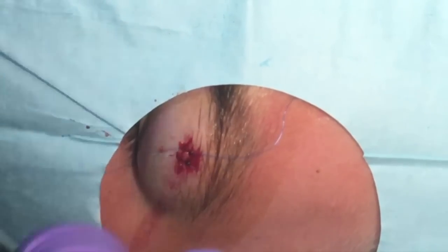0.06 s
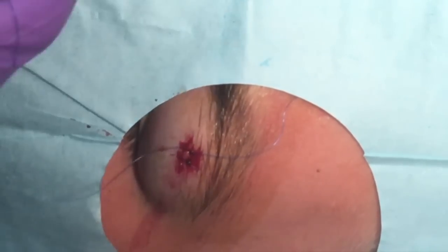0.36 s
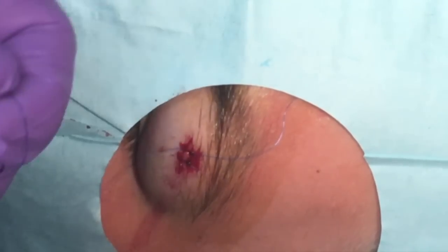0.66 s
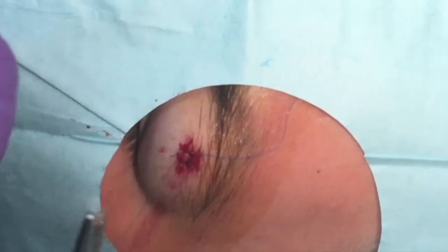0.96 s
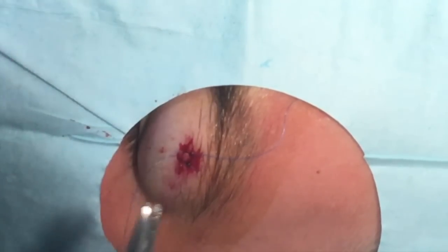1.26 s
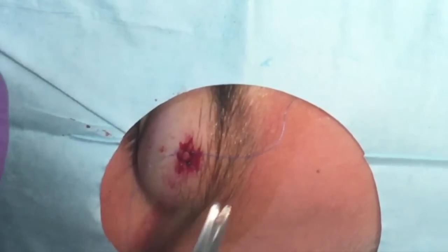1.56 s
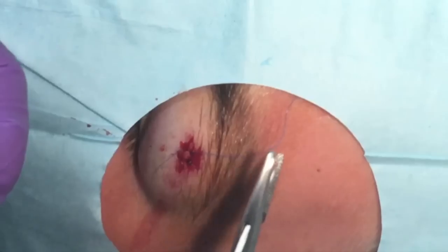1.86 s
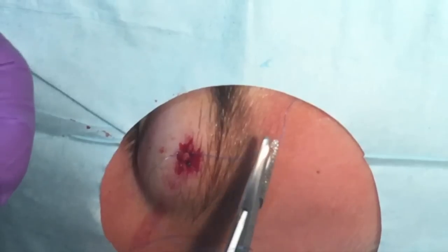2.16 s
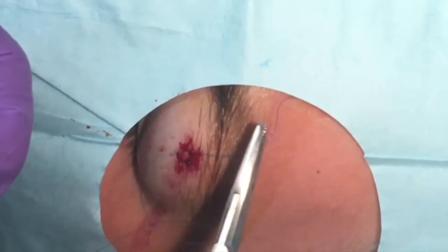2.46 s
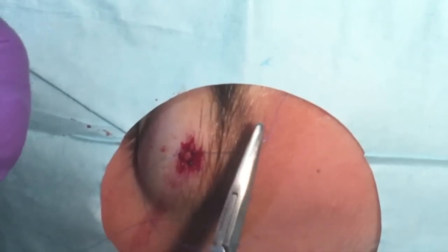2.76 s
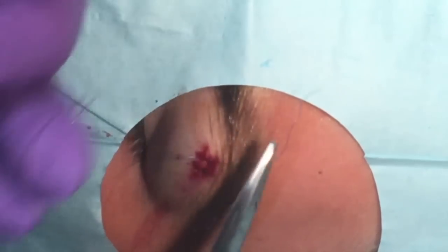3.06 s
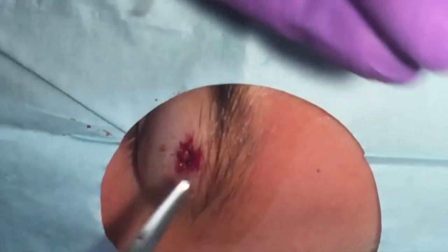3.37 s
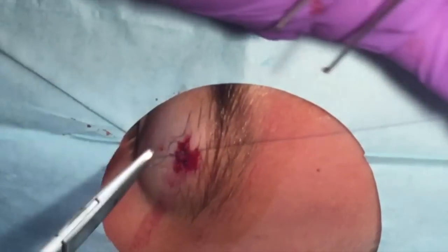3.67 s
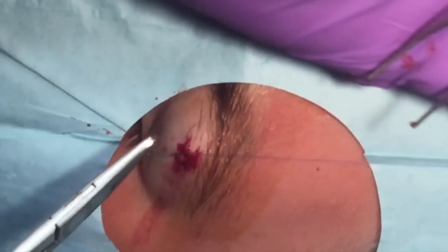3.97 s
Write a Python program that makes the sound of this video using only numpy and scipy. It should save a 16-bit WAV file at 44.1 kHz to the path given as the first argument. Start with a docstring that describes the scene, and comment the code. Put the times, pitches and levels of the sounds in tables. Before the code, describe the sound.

A metal needle holder clicks shut twice over a faint low hum.

```python
"""A quiet room, close on a steel needle holder being squeezed shut on a suture.
Its ratchet snaps over two teeth, each one ringing the steel arms, thumping the hand and stirring a short
room tail; then the catch settles with a light tick. The handling makes faint ticks, and the gloved grip
sticks and slips in a small creak. Underneath lie a deep hum, a low rumble and a faint, swelling hiss."""
import sys
import numpy as np
from scipy import signal
from scipy.fft import rfft, irfft
from scipy.io import wavfile
from scipy.ndimage import uniform_filter1d

SR = 44100
rng = np.random.default_rng(int(sys.argv[2]) if len(sys.argv) > 2 else 0)


def store_pcm(level_fs):
    """Save levels as 16-bit WAV."""
    pcm = np.round(np.clip(level_fs, -1, 1) * 32767).astype(np.int16)
    wavfile.write(sys.argv[1], SR, np.atleast_2d(pcm).T)


N = 176400


def amp(db):
    return 10 ** (np.asarray(db) / 20)


def unit_rms(x):
    return x / np.sqrt(np.mean(x ** 2) + 1e-20)


def curve_at(points, hz):
    """Straight lines between points on a log-frequency axis."""
    point_hz, value = np.transpose(points)
    return np.interp(np.log(hz + 1), np.log(point_hz + 1), value)


def fader(points):
    """Gain per sample from (seconds, dB) points."""
    return amp(np.interp(np.arange(N) / SR, *np.transpose(points)))


def add(mix, start_s, sound):
    part = mix[round(start_s * SR):][:len(sound)]
    part += sound[:len(part)]


def decay(t, t60):
    """An envelope that falls 60 dB in t60 seconds."""
    return np.exp(-np.log(1000) * t / t60)


def noise(spectrum, size, top_hz=15800):
    """Noise of rms 1, coloured by (Hz, dB) points."""
    hz = np.fft.rfftfreq(size, 1 / SR)
    white = rfft(rng.standard_normal(size))
    return unit_rms(irfft(white * amp(curve_at(spectrum, hz)) * (hz < top_hz), size))


def band_pass(x, edges_hz):
    return signal.sosfilt(signal.butter(2, edges_hz, "band", fs=SR, output="sos"), x)


def high_pass(x, hz):
    return signal.sosfilt(signal.butter(2, hz, "high", fs=SR, output="sos"), x)


def ring(modes, t):
    """Dying sines, one per mode."""
    return sum(amp(db) * decay(t, t60) * np.sin(2 * np.pi * hz * t) for hz, db, t60 in modes)


# Tone of the steady floor and of the hiss. Each row: frequency in Hz, relative level in dB.
FLOOR_TONE = [(100, 7.5), (700, 3.5), (1500, -1.5), (2600, -5), (4800, -9.5), (6300, -9), (9000, -10.5),
              (10400, -18), (11500, -12), (14000, -16), (15700, -17)]
HISS_TONE = [(200, -1), (600, 0), (900, -2.5), (1400, -2.5), (2200, -2.5), (3200, -7.5), (4400, -7),
             (4950, -11.5), (5600, -6), (6500, -7), (7600, -11), (9200, -10), (10400, -15), (11700, -13),
             (14000, -16.5), (15700, -17.5)]
# The swells of the hiss. Each row: time in seconds, level in dB.
HISS_SWELLS = [(0, -67.5), (.15, -74), (.27, -67.5), (.41, -76), (.65, -73), (.75, -80), (1.15, -78.5),
               (1.5, -84), (1.75, -84.5), (1.92, -75), (2.12, -83.5), (2.34, -81.5), (2.47, -71),
               (2.62, -78), (2.8, -79), (3.05, -69), (3.345, -68), (3.38, -73.5), (3.54, -74.5),
               (3.63, -79), (4, -79.5)]


def hiss(floor_db=-76.5, flutter_db=1.1):
    """A steady noise floor and a brighter hiss that swells and flutters."""
    flutter = amp(flutter_db * unit_rms(uniform_filter1d(rng.standard_normal(N), size=900)))
    bright = unit_rms(high_pass(noise(HISS_TONE, N), hz=196))
    return amp(floor_db) * noise(FLOOR_TONE, N) + fader(HISS_SWELLS) * flutter * bright


# The slow swell of the hum. Each row: time in seconds, level in dB.
HUM_SWELL = [(0, -44), (.45, -43.3), (.95, -48), (1.3, -53.5), (1.65, -49), (2.05, -44.3), (2.55, -43.5),
             (2.88, -47.5), (3.2, -44.7), (3.7, -42.5), (4, -45)]
# Tone of the rumble. Each row: frequency in Hz, relative level in dB.
RUMBLE_TONE = [(12, -30), (28, -18), (40, -12), (55, 0), (75, 2.5), (95, 0.5), (105, -11), (130, -4.5),
               (150, -10), (175, -17), (250, -21.5), (320, -26), (370, -23), (460, -35), (560, -37),
               (1000, -42.5), (2500, -61.5)]


def hum_and_rumble(deep_hz=58.02, upper_hz=119, upper_db=-65, rumble_db=-55.5):
    """A deep hum waxes and wanes under a faint steady tone; the room's rumble gently follows it."""
    phase_per_hz = 2 * np.pi * np.arange(N) / SR
    swell = fader(HUM_SWELL)
    hum = swell * np.sin(deep_hz * phase_per_hz) + amp(upper_db) * np.sin(upper_hz * phase_per_hz)
    rumble = amp(rumble_db) * unit_rms(swell ** 0.3) * noise(RUMBLE_TONE, N)
    return np.sqrt(2) * hum + rumble


# Light handling ticks. Each row: start in seconds, then low, mid and high band levels in dB.
HANDLING_TICKS = [(.4838, -62, -59.5, -75), (.490, -69, -64, -76), (0.5162, -55, -72, -82),
                  (.846, -75, -65.5, -72), (1.523, -71, -73, -63.5), (2.609, -67, -68, -62.5),
                  (2.722, -71, -65, -65), (2.7713, -59, -66, -78), (3.185, -63, -70, -75),
                  (3.3757, -57, -62, -81), (3.5412, -72, -62.5, -72), (3.7102, -57, -81, -82)]


def handling_ticks(t60=0.0099, bands_hz=((1000, 1940), (3000, 6400), (8000, 14000))):
    """The tool shifts in the hand: tiny dry bursts of noise in three bands."""
    out, t = np.zeros(N), np.arange(SR // 10) / SR
    for start_s, *levels_db in HANDLING_TICKS:
        burst = sum(amp(db) * unit_rms(band_pass(rng.standard_normal(len(t)), edges_hz))
                    for db, edges_hz in zip(levels_db, bands_hz))
        add(out, start_s, decay(t, t60) * burst)
    return out


# Slips of the gloved grip. Each row: start in seconds, level in dB.
GRIP_SLIPS = [(.778, -68), (.809, -62), (.819, -58.5), (.836, -65), (.877, -59), (.907, -64), (.930, -56),
              (.953, -58), (0.982, -62), (1.253, -65), (1.274, -63), (1.672, -65), (2.6, -62), (2.685, -62),
              (2.772, -62)]
# The creak's resonance. Each row: frequency in Hz, relative level in dB, t60 in seconds.
CREAK_MODES = [(2240, 0.5, 0.015), (2365, -8, 0.017)]


def grip_creak(rise_s=0.00159):
    """The glove sticks and slips; each slip rings a narrow resonance at a slightly different pitch."""
    out, t = np.zeros(N), np.arange(SR // 10) / SR
    attack = np.minimum(t / rise_s, 1)
    for start_s, db in GRIP_SLIPS:
        detune = rng.uniform(.98, 1.02)
        add(out, start_s - rise_s, amp(db) * attack * ring(CREAK_MODES, t * detune))
    return out


# Tone of the room tail, shared by the snap's rattle. Each row: frequency in Hz, relative level in dB.
ROOM_TONE = [(200, -11.5), (600, -16), (1100, -7), (2200, -4.5), (2900, -9), (3650, -1.5), (4600, -9.5),
             (5400, -1), (6300, -5), (7400, 1), (8200, -8), (9400, 0), (10100, -6), (11000, 1.5),
             (12500, -9), (13500, -0.5), (14600, -5.5), (15800, -2)]
# Length of the tail. Each row: frequency in Hz, t60 in seconds.
ROOM_T60 = [(300, 0.3), (2000, 0.16), (7000, 0.27), (10500, 0.22), (15000, 0.23)]


def room_tail(t, level_db=-46.5, build_s=0.0045):
    """Diffuse reflections of one click build up quickly, then each band dies at its own speed."""
    hz, frame_s, bands = signal.stft(noise(ROOM_TONE, len(t)), SR, nperseg=256)
    bands *= decay(frame_s, curve_at(ROOM_T60, hz)[:, None])
    tail = signal.istft(bands, SR, nperseg=256)[1][:len(t)]
    return amp(level_db) * tail * (1 - np.exp(-t / build_s))


# The ring of the settling catch. Each row: frequency in Hz, level in dB, t60 in seconds.
CATCH_MODES = [(2450, -56, 0.0079), (3300, -45, 0.0066), (5840, -54, 0.0055), (6450, -48, 0.0089),
               (8750, -52, 0.0044), (9370, -44, 0.0074), (11300, -42.5, 0.0048)]


def catch_tick(start_s=3.0611, room_db=-30):
    """The catch settles after the snaps: a light tick with a trace of room."""
    out, t = np.zeros(N), np.arange(SR // 2) / SR
    add(out, start_s, ring(CATCH_MODES, t) + amp(room_db) * room_tail(t))
    return out


# The broad resonances of the steel arms, and the faint ring that outlasts them.
# Each row: frequency in Hz, relative level in dB, t60 in seconds.
ARM_MODES = [(330, -30.5, 0.0066), (700, -25.5, 0.0042), (1173, -26.5, 0.0051), (2320, -31, 0.0097),
             (3510, -28, 0.0068), (4540, -33.5, 0.0092), (5690, -34, 0.0087), (6040, -27.5, 0.0081),
             (6670, -16, 0.005), (7620, -33, 0.011), (8530, -28.5, 0.0086), (9240, -27.5, 0.0083),
             (10910, -26, 0.011), (12100, -34.5, .005), (14000, -30, .008), (14700, -28, .011),
             (15300, -34.5, 0.012)]
AFTER_RING = [(7320, -60.5, 0.16), (7680, -60.5, .11), (9226, -71, .15), (9670, -74.5, .17),
              (10810, -68.5, .13), (14265, -60, 0.11), (14700, -67, .14), (15140, -58, .13)]


def snap(level_db, thump_db, low_db, mid_db, top_db, rebound_s, rebound_share, room_db):
    """A tooth drops into its notch and rebounds: the arms ring, the hand thumps, the room answers."""
    t = np.arange(SR // 2) / SR
    hz = np.fft.rfftfreq(len(t), 1 / SR)
    attack = np.minimum(t / 0.00022, 1)  # 0.22 ms of contact
    rattle = amp(-36) * noise(ROOM_TONE, len(t)) * decay(t, t60=0.016)
    steel = (ring(ARM_MODES, t) + rattle) * attack + ring(AFTER_RING, t)
    eq = amp(curve_at([(1200, low_db), (6000, mid_db), (10500, 0.014), (14500, top_db)], hz))
    rebound = 1 + rebound_share * np.exp(-2j * np.pi * hz * rebound_s)  # the hit plus a delayed copy
    steel = irfft(rfft(steel) * eq * rebound, len(t))
    steel *= t < t[-1] / 2  # mute the EQ's pre-ring, which wraps round to the end
    thump = ring([(190, thump_db, 0.013)], t)
    sound = amp(level_db) * (steel + amp(room_db) * room_tail(t)) + thump
    return high_pass(sound, hz=150)  # so small a tool radiates little bass


# The two snaps. Each row: start in seconds, level in dB, thump in dB, low, mid and top EQ in dB,
# rebound delay in seconds, rebound as a share of the hit, room send in dB.
RATCHET_SNAPS = [(2.8335, -0.5, -39, -0.5, 5.2, 8, 0.000525, 0.22, 0.5),
                 (2.95, -1.4, -30.5, -2.5, 2, 4, 0.000124, 0.25, -1)]


def ratchet():
    """The squeeze drives the ratchet over one tooth after the other."""
    out = np.zeros(N)
    for start_s, *settings in RATCHET_SNAPS:
        add(out, start_s, snap(*settings))
    return out


def scene():
    """Room tone, handling and ratchet at one close microphone."""
    return (hiss() + hum_and_rumble() + handling_ticks() + grip_creak() + catch_tick() + ratchet())[None]


def record(dry):
    """A steep low-pass trims the air above 16.5 kHz."""
    taps = signal.firwin(255, 16500, window=("kaiser", 9), fs=SR)
    return signal.oaconvolve(dry, taps[None], "same")


dry = scene()
out = record(dry)
store_pcm(out)
```